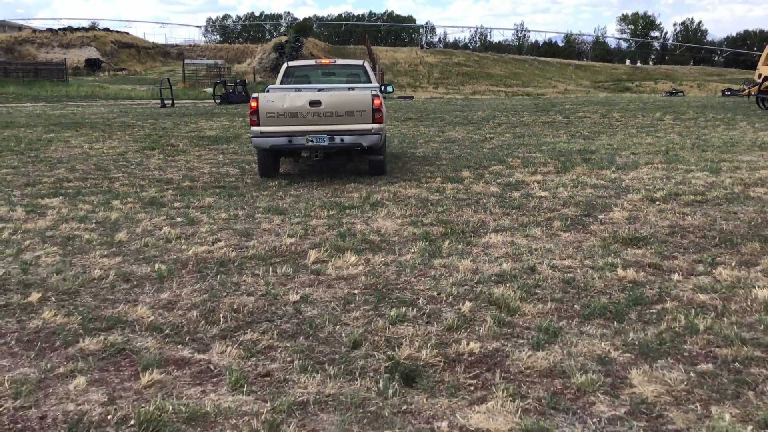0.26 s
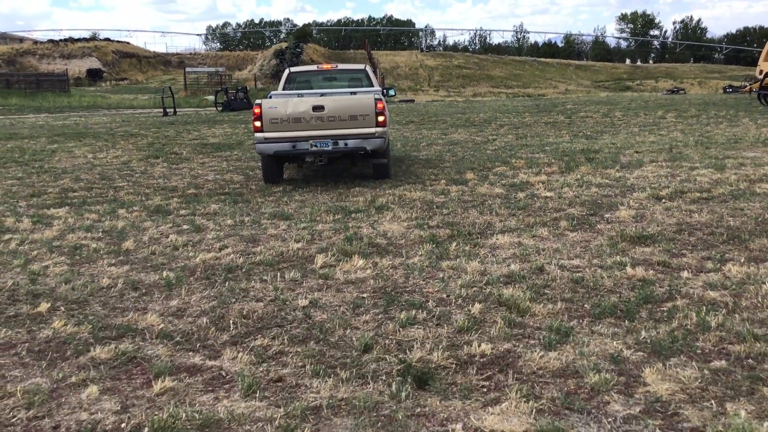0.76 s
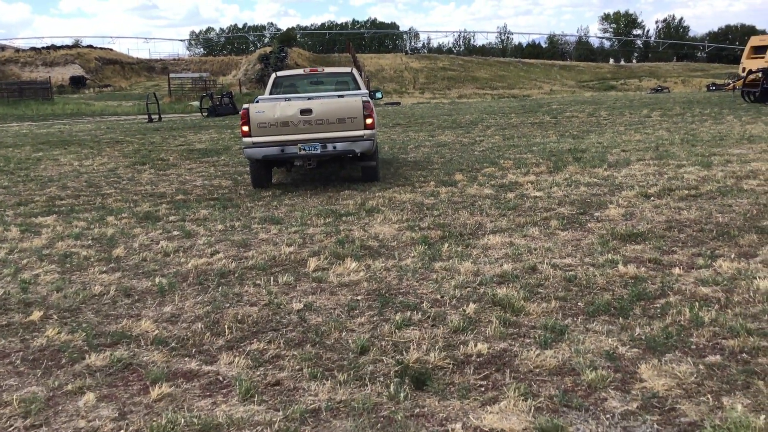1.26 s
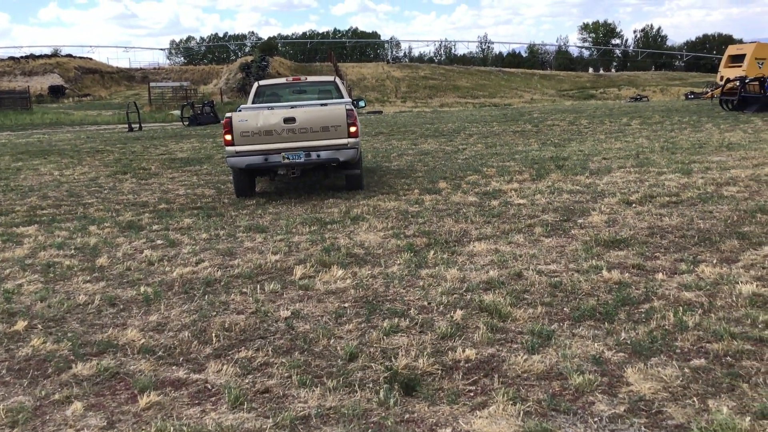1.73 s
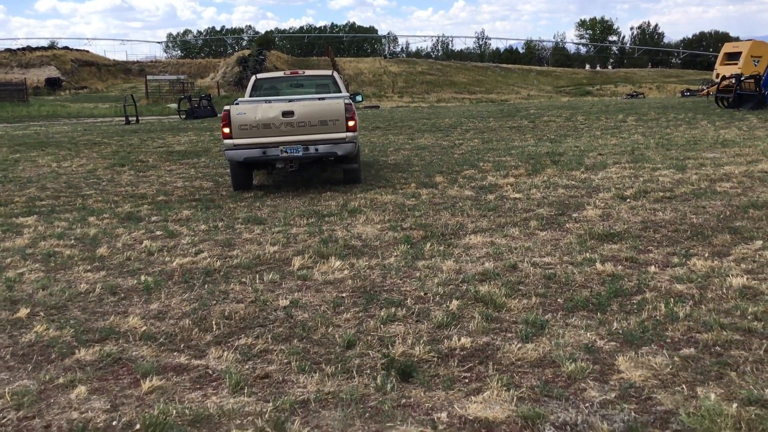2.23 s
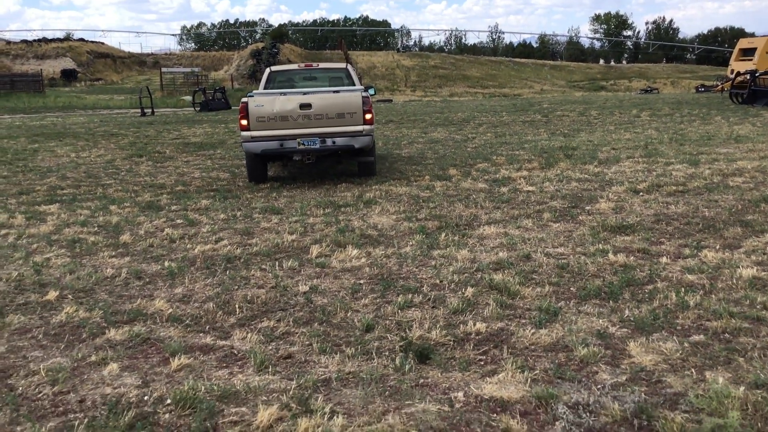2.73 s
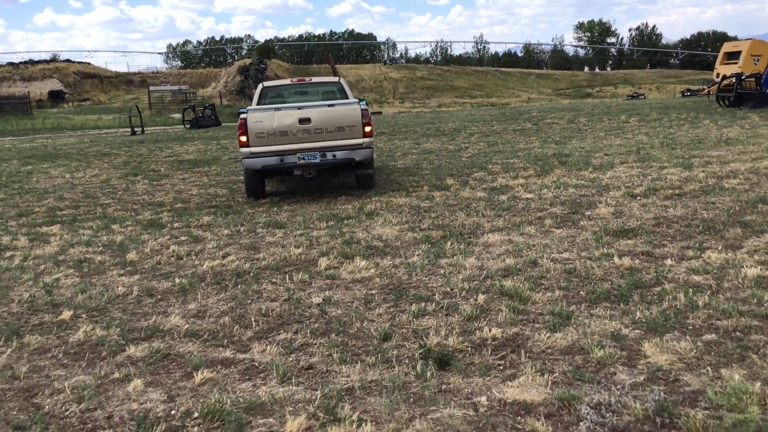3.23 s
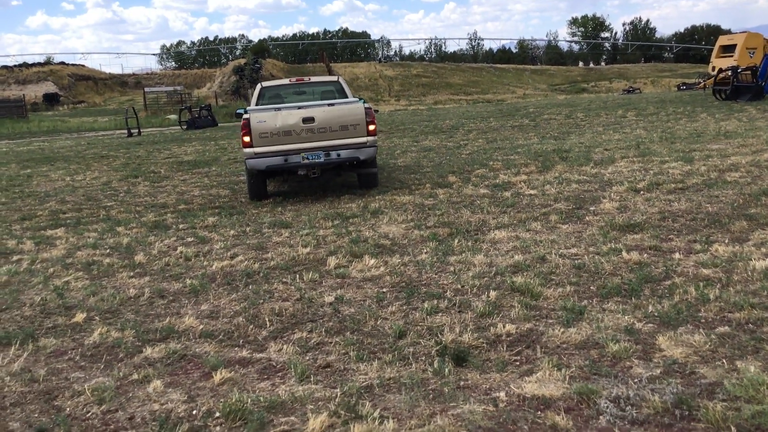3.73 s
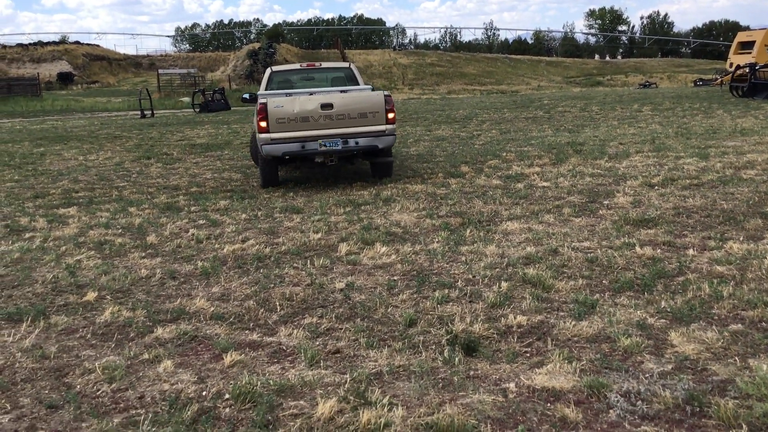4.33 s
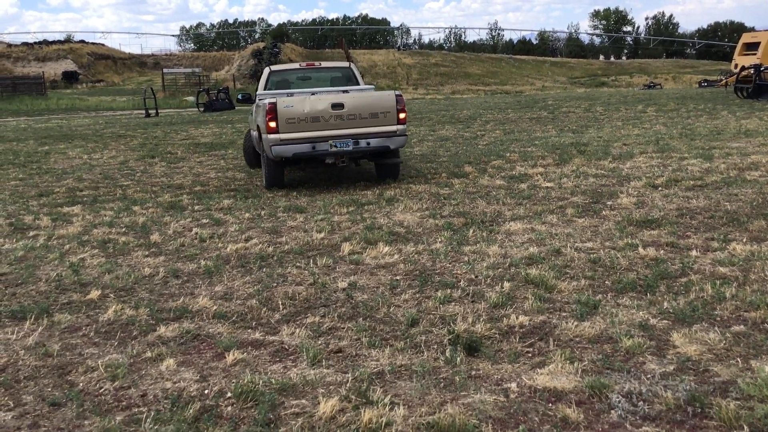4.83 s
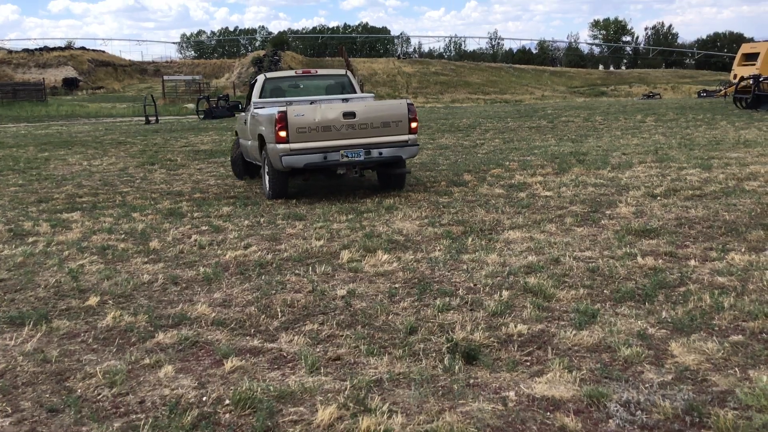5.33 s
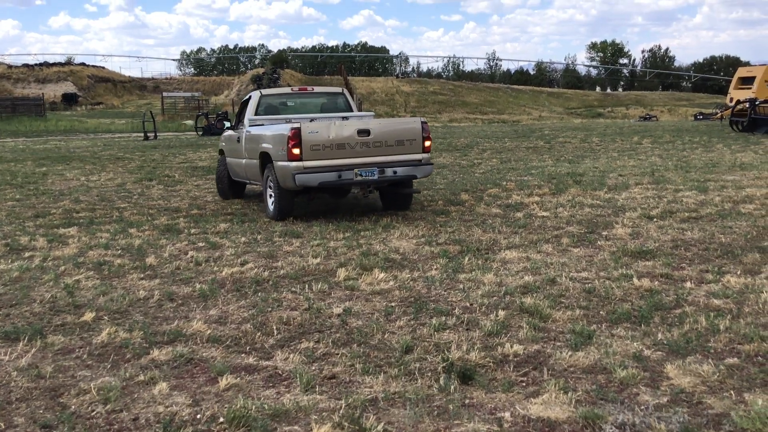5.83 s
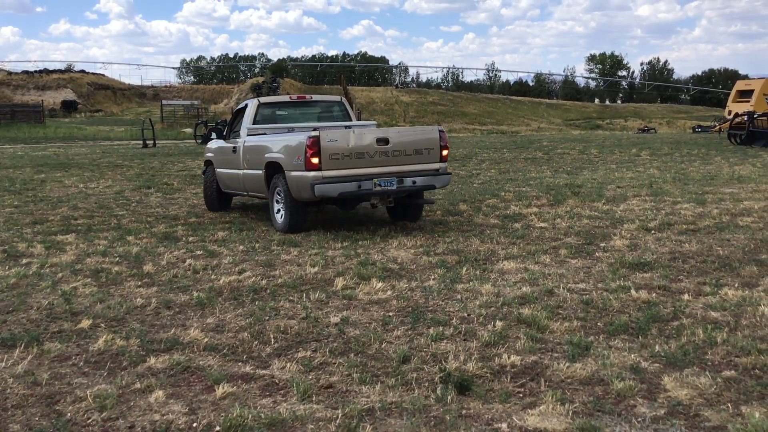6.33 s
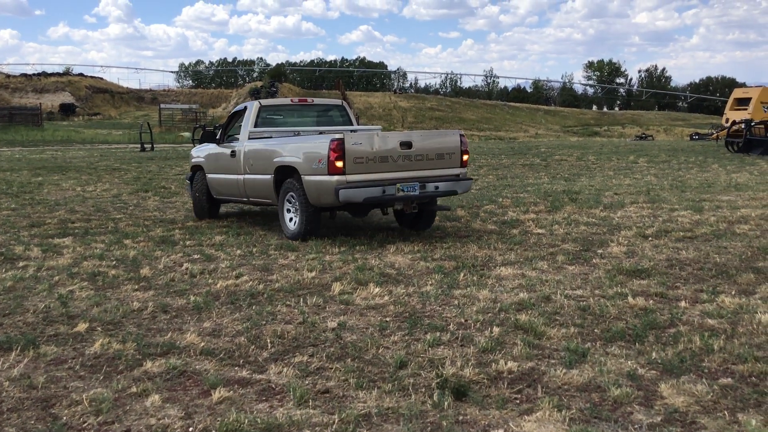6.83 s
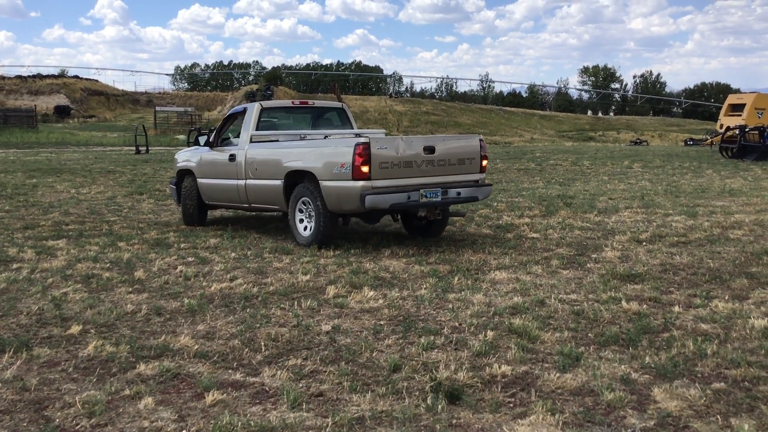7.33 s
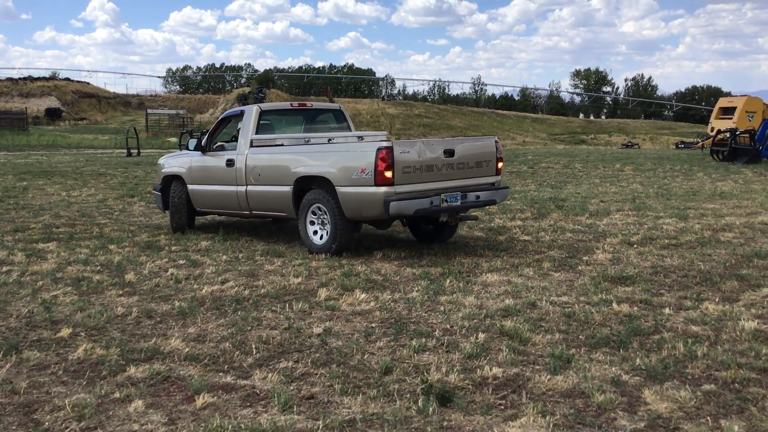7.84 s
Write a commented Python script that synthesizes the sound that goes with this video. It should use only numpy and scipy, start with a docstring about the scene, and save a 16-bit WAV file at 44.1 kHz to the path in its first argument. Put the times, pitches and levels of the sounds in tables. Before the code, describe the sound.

In an open dry field, a pickup's eight-cylinder engine runs slowly some distance away: a low, uneven hum and burble with muffled exhaust thuds, faint metallic clatter and a distant airy hiss. From 0 to 2.3 s the revs waver gently, with tiny grass ticks and brief scuffs at about 0.5 and 1.7 s. Between 2.4 and 2.95 s close turf scuffs and sharp stalk snaps gather, then a hard, dull low wind knock hits the microphone at 3 s, with softer bumps at 3.4 to 4.3 s. The engine climbs from 3.5 s, humming higher and clattering until 5.6 s. A second hard knock lands at 5.65 s as the revs sag. From 6 s the nearer truck revs up, with tyre rush and crackling grass, eases at 7 s, then rises towards 8 s amid wind flutter, small bumps and bright snaps.

```python
"""Pickup creeping over dry grass

An eight-cylinder pickup creeps over a dry pasture, coming nearer and turning side-on.
Its firings make the exhaust hum, throb and burble and the engine clatter, louder with effort.
Filtered noise and grains make dry grass rustle; short ringing cracks are stalks that snap.
Wind bumps the microphone with dull knocks made of low swings, hardest near 3 s and 5.7 s."""
import sys
import numpy as np
from scipy import signal
from scipy.fft import rfft, irfft, next_fast_len
from scipy.io import wavfile
from scipy.ndimage import uniform_filter1d

SR = 44100
rng = np.random.default_rng(int(sys.argv[2]) if len(sys.argv) > 2 else 0)


def waveform_to_disk(signal):
    """Save audio, clipped to [-1, 1], as 16-bit WAV at the path in sys.argv[1]."""
    frames = np.transpose(np.atleast_2d(signal))
    scaled = np.clip(frames, -1, 1) * 32767
    samples = np.round(scaled).astype(np.int16)
    wavfile.write(sys.argv[1], SR, samples)


N = 356019
TIME = np.arange(N) / SR
FFT_SIZE = next_fast_len(N, True)
FREQS = np.maximum(np.fft.rfftfreq(FFT_SIZE, 1 / SR), 1)

# engine speed, as cylinder firings per second: time_s, firing_hz
FIRING = [(0.0, 43.52), (0.52, 42.95), (0.81, 47.68), (1.35, 46.63), (1.75, 38.43), (2.07, 47.01),
          (2.49, 50.9), (2.79, 48.23), (3.1, 45.7), (3.37, 47.44), (3.71, 55.57), (3.91, 67.57),
          (4.11, 73.85), (4.49, 63.04), (5.06, 68.87), (5.6, 61.07), (5.79, 46.2), (5.9, 48.67),
          (6.02, 53.82), (6.35, 56.35), (6.8, 62.9), (6.9, 55.42), (7.0, 47.26), (7.1, 44.96),
          (7.28, 48.38), (7.55, 51.86), (7.8, 63.4), (7.93, 68.73), (8.07, 70.9)]
# the truck's path: time_s, distance_m, side_on (0 to 1)
PATH = [(0, 13.8, 0), (3.3, 14.1, 0.4), (4.5, 12.4, 0.15), (5.5, 9.8, 0.45), (6.3, 7.25, 0.92),
        (7.2, 8.57, 0.99), (8.07, 7.94, 1)]
# spells in which the engine labours or eases off: start_s, length_s, hum_rise_db, rattle_rise_db
LABOUR = [(0.38, 0.19, 0, 6.5), (0.603, 0.94, 2.5, 2.5), (1.74, 0.27, 3.5, 2), (2.81, 0.49, -11, -2.5),
          (3.067, 0.59, -5, -1), (3.6, 0.41, -0.5, 3.5), (4.917, 0.84, -0.5, 1.5),
          (5.68, 0.3575, -10.5, 4.5), (6.036, 0.65, -0.5, 5), (6.966, 0.29, -8.5, -9),
          (7.711, 0.22, -0.5, -11)]
# strength of each cylinder in firing order, as the two banks take unequal turns: strength_db
CYLINDERS = [-2.2, -4, -2, -4.5, -2, -2, -5, -2.5]
# how well the tailpipe passes a harmonic: pitch_hz, level_db
TAILPIPE = [(45, -18), (68, -14), (84, -15.5), (96, -2), (116, -2), (132, -2), (150, -4.5), (167, -1.5),
            (182, -8.5), (205, -19.5), (235, -28), (280, -36)]

# Resonances; each table lists pitch_hz, width_hz, relative_level_db
# exhaust pipe
EXHAUST_PIPE = [(78, 38, -5.5), (119.3, 21, 6), (167.5, 13.2, 1.5), (199.7, 26, -10.5)]
# pipe that joins the two banks
CROSS_PIPE = [(95.6, 22.6, -1.5), (147.8, 26, 1.5), (168.6, 13.2, 5), (193.2, 22.7, 0.5), (287, 40, -7.5)]
# silencer box
SILENCER_BOX = [(299.9, 30.6, 1.5), (345.6, 7.6, 1), (422, 78, -19.5)]
# engine block and covers
BLOCK = [(1122, 51, -3), (1307, 29, 3.5), (1773, 23, -2), (1850, 26, 7), (1972, 63, 5.5), (2261, 46, 1.5),
         (2514, 46, 2), (2624, 125, 2), (2874, 32, 2.5), (3470, 41, -2.5), (3980, 49, -6), (4870, 170, -20)]
# engine bay, heard through the front wheel arch
WHEEL_ARCH = [(769, 30, 3.5), (1264, 34, 2.5), (1536, 24, 2.5), (1715, 29, -1.5), (2035, 43, 2),
              (2250, 36, 1), (2765, 100, -1.5)]

# Spectra; each table lists pitch_hz, relative_level_db (per Hz)
# rush of tyres and fan
ROLL_COLOUR = [(150, 4), (350, 1), (500, -1.5), (700, -2.5), (1000, -8.5), (1600, -4.5), (2400, -6.5),
               (3200, -11.5), (4800, -13), (6000, -21.5), (7500, -35), (16000, -35)]
# far hiss of the breeze
AIR_COLOUR = [(200, 4), (700, 2.5), (1500, -11.5), (3000, -12), (4800, -8), (6000, -15.5), (7500, -22),
              (9000, -23), (11000, -24), (16000, -59)]
# dry blades of grass
GRASS_COLOUR = [(250, -48), (500, 7), (1200, -2.5), (3000, 1), (5000, -0.5), (7600, -8.5), (8400, 3),
                (11000, -2.5), (14000, 1), (16000, -4.5)]
# scuffed turf
SCUFF_COLOUR = [(150, 4), (380, 0), (750, -8.5), (1050, -11.5), (1700, -18), (3500, -24.5), (6000, -37),
                (16000, -75)]
# wind fluttering on the microphone
BREEZE_COLOUR = [(20, -17.5), (62, -4.5), (95, -9), (200, -13), (600, -39.5), (3000, -96)]
# flutter inside a wind knock
KNOCK_COLOUR = [(30, -13), (150, 9.5), (240, 7), (340, 6), (490, -1), (640, -9.5), (740, -23), (950, -45),
                (3000, -89)]

# faint whistles and squeaks: start_s, length_s, pitch_hz, level_db
WHISTLES = [(.12, .18, 4050, -86), (0, .9, 4900, -89), (.42, .08, 1150, -79), (1.9, .5, 4650, -89),
            (7.61, .06, 2210, -72)]
# tyres crushing dry grass: time_s, level_db
CRUSH = [(0, -87.5), (1.5, -90), (3.3, -86.5), (3.9, -81), (5.2, -83), (5.5, -77), (6.2, -77), (6.6, -76),
         (7, -76.5), (7.5, -79.5), (7.8, -67.5), (8.07, -66.5)]
# brushes through the grass close by: start_s, length_s, blade_swish_db, turf_scuff_db
BRUSHES = [(0.05, 0.07, -75.5, -89), (0.539, 0.062, -105, -65.5), (1.619, 0.13, -77.5, -67.5),
           (1.754, 0.13, -84, -71.5), (2.38, 0.11, -107, -64), (2.57, 0.2, -77.5, -69),
           (2.591, 0.12, -91, -63), (2.827, 0.052, -77, -65), (2.89, 0.09, -81, -57.5),
           (3.435, 0.23, -77, -61.5), (5.329, 0.06, -75, -88)]
# low flutter of wind on the microphone: time_s, level_db
BREEZE = [(0, -70.5), (2.6, -66), (4.1, -51), (4.8, -58.5), (5.3, -54.5), (7, -57.5), (7.6, -49),
          (8.07, -50.5)]
# snapping dry stalks: start_s, peak_db, brightness_hz
SNAPS = [(.118, -60, 2800), (1.173, -60, 2500), (1.915, -58, 1000), (2.094, -60, 2300), (2.445, -54, 1800),
         (2.551, -54.5, 850), (2.628, -57, 1400), (2.637, -46, 330), (2.680, -47, 1500),
         (2.681, -42.5, 420), (2.695, -48, 350), (2.866, -60, 3300), (2.897, -61, 2800),
         (2.9285, -48, 4800), (2.9295, -53, 1900), (2.931, -49, 600), (2.9315, -45, 240),
         (2.938, -55, 1500), (2.965, -59, 3500), (3.348, -61, 3800), (3.349, -59, 700), (4.315, -48, 14000),
         (5.978, -53, 11000), (6.013, -57, 11000), (6.053, -57, 11000), (7.789, -50, 10000),
         (7.935, -40, 11000), (8.012, -47, 12000)]
# wind knocks on the microphone: middle_s, swing_peak_db, pitch_hz, flutter_db (against the swing)
KNOCKS = [(0.251, -43, 73, -28), (.54, -52, 70.5, -33), (2.988, -23, 105.4, -17.5),
          (2.999, -26.5, 124, -10.5), (3.016, -27, 84.5, -22), (3.410, -29.5, 84.3, -21.5),
          (3.653, -34, 74, -16.5), (3.964, -29.5, 148.8, -40), (4.327, -34.5, 72.74, -28),
          (5.615, -30.5, 77.3, -21), (5.654, -21.5, 105.7, -8), (5.664, -22, 78.5, -23),
          (5.779, -33.5, 84, -34), (5.795, -49.5, 333.7, -3), (5.88, -32.5, 128.2, -31),
          (5.91, -36.5, 74.2, -40), (7.368, -34.5, 66, -16), (7.617, -33.5, 68.04, -36),
          (7.658, -36, 129, -21), (7.769, -33.5, 105.5, -16)]

# _EFFORT_DB is the rise per octave of effort, _SIDE_DB the rise from end-on to fully side-on
FULL_LEVEL_M = 14  # truck levels hold at this distance
IDLE_HZ, THROTTLE_LEAD_S = 54.8, 0.013  # effort counts octaves above this fast idle
HUM_DB, HUM_EFFORT_DB, OVERTONE_SIDE_DB = -50, 10, 1.5
TOP_OVERTONE_DB = -3
PIPE_LAG_S = 0.008  # time each firing takes to leave the tailpipe
LOPE_DB = 1  # sway of the hum, once in two turns of the crank
BURBLE_DB, BURBLE_EFFORT_DB = -58.5, 9.5
THROB_DB, THROB_EFFORT_DB = -59.5, 5
SILENCER_DB, SILENCER_EFFORT_DB, SILENCER_SIDE_DB = -64.5, 5, -6.5
CLATTER_DB, CLATTER_EFFORT_DB, CLATTER_SIDE_DB = -75.5, 14.5, -8
CLATTER_PATCHY_DB, CLATTER_PATCHES_HZ = 0.6, 22
CHATTER_DB, CHATTER_EFFORT_DB, CHATTER_SIDE_DB = -95, 15.5, 15
COVER_HZ, COVER_WIDTH_HZ, COVER_DB, COVER_SIDE_DB = 2265, 46, -86.5, -0.5
TICK_DB, TICK_EFFORT_DB = -93.5, 12
ROLL_DB, ROLL_EFFORT_DB, ROLL_SIDE_DB = -76.5, 3, 6
WHINE_DB, WHINE_EFFORT_DB, WHINE_SIDE_DB = -102.5, 24, 15
WHINE_PER_FIRING = 14.7  # whine cycles in each firing
WHINE_WAVER_DB, WHINE_WAVERS_HZ = 4, 16
DRONE_HZ, DRONE_DB = 171.7, -59
WHISTLE_WIDTH_HZ = 44
CRUSH_PATCHY_DB, CRUSH_PATCHES_HZ = 2.5, 22.4
SCRAPE_PATCHY_DB, SCRAPES_HZ = -1, 43
BRUSH_ATTACK_S, BRUSH_RELEASE_S = 0.023, 0.0073
# thick stalks sound lower and ring longer: decay at 1 kHz, power of the pitch
SNAP_DECAY_S, SNAP_DECAY_POWER = 0.0038, 0.65
KNOCK_CYCLES = 0.7  # half length, in swings of its pitch
# softer eddies flutter more slowly: a hard peak, the fall that halves the rate, the slowest share
HARD_KNOCK_DB, FLUTTER_HALVING_DB, SLOWEST_FLUTTER = -20, 9, 0.68
TOP_HZ = 15800


def undb(db):
    """Turn decibels into gain."""
    return 10 ** (np.asarray(db) / 20)


def unit(x):
    """Scale a sound to an average (rms) level of 1."""
    return x / np.sqrt(np.mean(x ** 2))


def curves(table):
    """Join the points of each column by straight lines in time."""
    s, *columns = np.transpose(table)
    return [np.interp(TIME, s, column) for column in columns]


def filtered(x, response):
    """Apply a frequency response; the result has rms 1."""
    return unit(irfft(rfft(x, FFT_SIZE) * response, FFT_SIZE)[:N])


def noise():
    """Make white noise, equally strong at all pitches."""
    return rng.standard_normal(N)


def walk(rate_hz):
    """Wander slowly by chance, with spread 1."""
    return filtered(noise(), np.exp(-(FREQS / rate_hz) ** 2))


def colour(x, points):
    """Give a sound the spectrum drawn by (Hz, dB) points."""
    hz, db = np.transpose(points)
    return filtered(x, undb(np.interp(np.log(FREQS), np.log(hz), db)))


def band(hz, width_hz):
    """Give the frequency response of one resonance."""
    return 1 / (1 + 1j * (FREQS ** 2 - hz ** 2) / (FREQS * width_hz))


def ring(x, modes, order=1):
    """Send a sound through resonances; a higher order gives steeper skirts."""
    response = sum(undb(db) * band(hz, order * width) ** order for hz, width, db in modes)
    return filtered(x, response)


def puffs(firings, scatter_db, length):
    """Jump at each firing and die away, each of its own strength; length is a share of a firing."""
    k = firings.astype(int)
    size_db = np.array(CYLINDERS)[k % len(CYLINDERS)] + scatter_db * rng.standard_normal(N)[k]
    return undb(size_db) * np.exp(-(firings % 1) / length)


def grains(per_s, spread_db):
    """Scatter sparse random impulses of unequal size."""
    size = undb(spread_db * np.minimum(rng.exponential(size=N), 4))
    return (rng.random(N) < per_s / SR) * size * np.sign(noise())


def repeating(firings, order=6000):
    """Repeat one random texture every two turns of the crank."""
    place = firings / len(CYLINDERS) % 1 * order
    return np.interp(place, np.arange(order), rng.standard_normal(order))


def swell(start, length):
    """Rise, hold for a while, die away."""
    rise = np.clip((TIME - start) / BRUSH_ATTACK_S, 0, 1)
    return rise * np.exp(-np.clip((TIME - start - length) / BRUSH_RELEASE_S, 0, 20))


def bump(s, half_length):
    """Swell smoothly around a moment."""
    return np.exp(-np.minimum(((TIME - s) / half_length) ** 2, 50))


def effort_of(firing_hz):
    """Work the engine harder at speed, and harder still while it picks up."""
    octaves = uniform_filter1d(np.log2(firing_hz / IDLE_HZ), size=SR // 8)
    return octaves + THROTTLE_LEAD_S * np.gradient(octaves, TIME)


def labour():
    """Raise or lower hum and rattle (dB) in spells as the engine labours or eases off."""
    return sum(np.outer([hum_db, rattle_db], swell(s, length)) for s, length, hum_db, rattle_db in LABOUR)


def exhaust(firing_hz, firings, effort, labour_db, side_on, count=4):
    """Even firings hum in harmonics shaped by the tailpipe, and rushing gas burbles in the pipe."""
    pipe_hz, pipe_db = np.transpose(TAILPIPE)
    hum = 0
    for k in range(1, count + 1):
        db = np.interp(k * firing_hz, pipe_hz, pipe_db)
        # labour lifts the two lowest harmonics most
        db = db + labour_db * min(2 / k, 1) ** 3
        db = db + OVERTONE_SIDE_DB * side_on * (k > 2) + TOP_OVERTONE_DB * (k > 3)
        wave = np.sin(2 * np.pi * k * (firings - PIPE_LAG_S * firing_hz))
        hum = hum + np.sqrt(2) * undb(db + 0.3 * walk(26)) * wave
    lope_db = LOPE_DB * np.sin(2 * np.pi * firings / len(CYLINDERS))
    hum_db = HUM_DB + HUM_EFFORT_DB * effort + lope_db
    gas = ring(puffs(firings, scatter_db=0.0, length=0.29) * noise(), EXHAUST_PIPE, order=2)
    gas_db = BURBLE_DB + BURBLE_EFFORT_DB * effort + 0.48 * labour_db
    return hum * undb(hum_db) + gas * undb(gas_db)


def throb(firings, effort):
    """Uneven firings, repeating every two turns of the crank, throb between the hum's harmonics."""
    k = firings.astype(int)
    strength = undb(CYLINDERS)
    uneven = unit(strength - strength.mean())[k % len(CYLINDERS)] + 0.18 * noise()[k]
    pulses = uneven * np.exp(-(firings % 1) / 0.082)
    return ring(pulses, CROSS_PIPE, order=2) * undb(THROB_DB + THROB_EFFORT_DB * effort)


def silencer(firings, effort, side_on):
    """Each firing thuds in the silencer box, softer as the truck turns side-on."""
    push = puffs(firings, scatter_db=1, length=0.28)
    thuds = ring(push, SILENCER_BOX, order=2) + 1.9 * ring(push * noise(), SILENCER_BOX, order=2)
    return unit(thuds) * undb(SILENCER_DB + SILENCER_EFFORT_DB * effort + SILENCER_SIDE_DB * side_on)


def clatter(firings, effort, rattle_db, side_on):
    """Firings rattle the block, a cover and the valves, whose resonances ring; thin ticks ride on top."""
    # a repeating part makes each turn much like the last
    blows = 0.04 + puffs(firings, scatter_db=2, length=0.22)
    blows = blows * (noise() + 0.8 * repeating(firings))
    valves = 0.06 + puffs(firings, scatter_db=2.6, length=0.2)
    valves = valves * (noise() + 1.2 * repeating(firings))

    block_db = CLATTER_DB + CLATTER_EFFORT_DB * effort + rattle_db + CLATTER_SIDE_DB * side_on
    block_db = block_db + CLATTER_PATCHY_DB * walk(CLATTER_PATCHES_HZ)
    block = ring(blows, BLOCK, order=2) * undb(block_db)

    chatter_db = CHATTER_DB + CHATTER_EFFORT_DB * effort + CHATTER_SIDE_DB * side_on
    chatter = ring(valves, WHEEL_ARCH, order=2) * undb(chatter_db)

    # the cover's level does not depend on effort, so it rings even at idle
    cover_db = COVER_DB + COVER_SIDE_DB * side_on + 0.32 * rattle_db
    cover = ring(valves, [(COVER_HZ, COVER_WIDTH_HZ, 0)], order=2) * undb(cover_db)

    metal = [(8280, 71, -4.0), (8580, 240, -7.0), (9400, 76, -5.5)]  # pitch_hz, width_hz, level_db
    ticks = ring(grains(per_s=70, spread_db=4.5) + 0.0041 * noise(), metal, order=2)
    return block + chatter + cover + ticks * undb(TICK_DB + TICK_EFFORT_DB * effort)


def running_gear(firings, effort, side_on):
    """Tyres and fan rush as noise and a belt-driven pump whines with engine speed, louder side-on."""
    roll_db = ROLL_DB + ROLL_EFFORT_DB * effort + ROLL_SIDE_DB * side_on + 1.08 * walk(38)
    roll = colour(noise(), ROLL_COLOUR) * undb(roll_db)
    whine_db = WHINE_DB + WHINE_EFFORT_DB * effort + WHINE_SIDE_DB * side_on
    whine_db = whine_db + WHINE_WAVER_DB * walk(WHINE_WAVERS_HZ)
    return roll + np.sin(2 * np.pi * WHINE_PER_FIRING * firings) * undb(whine_db)


def drone():
    """One low tone wavers slightly but does not follow the engine speed."""
    pitch_hz = DRONE_HZ + 2 * walk(4.4)
    return np.sin(2 * np.pi * np.cumsum(pitch_hz) / SR) * undb(DRONE_DB + 2.94 * walk(9.6))


def field():
    """The breeze hisses far off as noise, with faint whistles of narrow-band noise."""
    hiss = colour(noise(), AIR_COLOUR) * undb(-74.0 + 0.5 * walk(2.7))
    whistles = 0
    for s, length, hz, db in WHISTLES:
        tone = ring(noise(), [(hz, WHISTLE_WIDTH_HZ, 0)], order=2)
        whistles = whistles + tone * undb(db) * swell(s, length)
    return hiss + whistles


def grass():
    """Blades crackle in patches under the tyres; close brushes swish blades and scuff turf."""
    crush_db, = curves(CRUSH)
    blades = colour(noise() + 0.6 * unit(grains(per_s=160, spread_db=4)), GRASS_COLOUR)
    # the turf has dense, dull grains
    grit = colour(noise() + unit(grains(per_s=760, spread_db=-10.5)), SCUFF_COLOUR)
    grit = grit * undb(SCRAPE_PATCHY_DB * walk(SCRAPES_HZ))
    brushes = 0
    for s, length, swish_db, scuff_db in BRUSHES:
        brushes = brushes + swell(s, length) * (undb(swish_db) * blades + undb(scuff_db) * grit)
    return brushes + blades * undb(crush_db + CRUSH_PATCHY_DB * walk(CRUSH_PATCHES_HZ))


def breeze():
    """Light wind flutters on the microphone as low noise of changing level."""
    breeze_db, = curves(BREEZE)
    return colour(noise(), BREEZE_COLOUR) * undb(breeze_db + 0.52 * walk(25))


def snaps():
    """Stalks break with a short ringing crack, dull or bright with their thickness."""
    out = np.zeros(N)
    for s, db, hz in SNAPS:
        decay_s = SNAP_DECAY_S * (1000 / hz) ** SNAP_DECAY_POWER
        age_s = np.clip(TIME - s, 0, 30 * decay_s)
        burst = noise() * (age_s > 0) * np.exp(-age_s / decay_s)
        crack = ring(burst, [(hz, 0.5 * hz, 0)], order=3)
        out += undb(db) * crack / np.abs(crack).max()
    return out


def knocks():
    """Eddies hit the microphone: low swings of pressure with a dull flutter, faster in hard hits."""
    out = np.zeros(N)
    turbulence = colour(noise(), KNOCK_COLOUR)
    for s, db, hz, flutter_db in KNOCKS:
        rate = np.clip(2 ** ((db - HARD_KNOCK_DB) / FLUTTER_HALVING_DB), SLOWEST_FLUTTER, 1)
        eddy = bump(s, KNOCK_CYCLES / hz)
        # slowed turbulence inside the eddy, scaled to the eddy's own rms
        flutter = unit(eddy * np.interp(TIME * rate, TIME, turbulence)) * np.sqrt(np.mean(eddy ** 2))
        swing = eddy * np.cos(2 * np.pi * hz * (TIME - s))
        out += undb(db) * (swing + undb(flutter_db) * flutter)
    return out


def scene():
    """Drive the truck's parts by engine speed and path, then add drone, field, grass and wind."""
    firing_hz, = curves(FIRING)
    distance_m, side_on = curves(PATH)
    effort = effort_of(firing_hz)
    # running count of firings, with slightly uneven speed
    firings = np.cumsum(firing_hz * (1 + 0.003 * walk(15))) / SR
    labour_db, rattle_db = labour()
    truck = exhaust(firing_hz, firings, effort, labour_db, side_on)
    truck = truck + throb(firings, effort)
    truck = truck + silencer(firings, effort, side_on)
    truck = truck + clatter(firings, effort, rattle_db, side_on)
    truck = truck + running_gear(firings, effort, side_on)
    truck = truck * FULL_LEVEL_M / distance_m
    surroundings = drone() + field() + grass() + breeze() + snaps() + knocks()
    return (truck + surroundings)[None]


def record(dry):
    """Drop the deepest bass and cut everything above TOP_HZ steeply."""
    bass_cut = signal.butter(4, 42, "high", fs=SR, output="sos")
    top_cut = signal.ellip(10, 0.2, 70, TOP_HZ, fs=SR, output="sos")
    return signal.sosfilt(top_cut, signal.sosfilt(bass_cut, dry))


dry = scene()
out = record(dry)
waveform_to_disk(out)
```